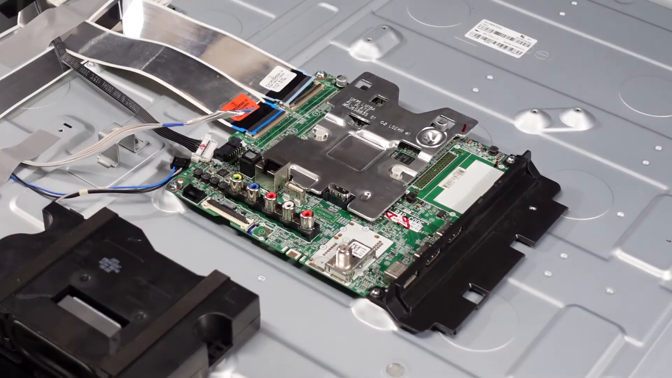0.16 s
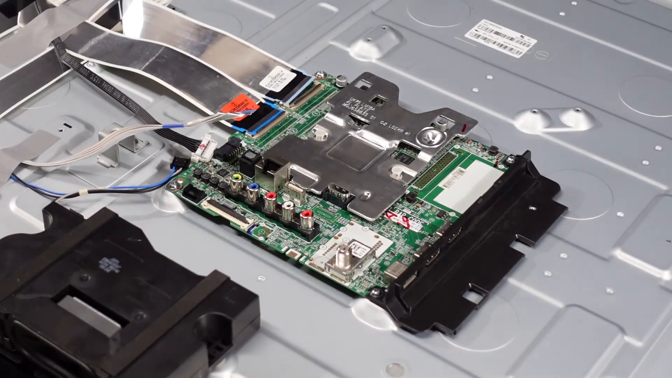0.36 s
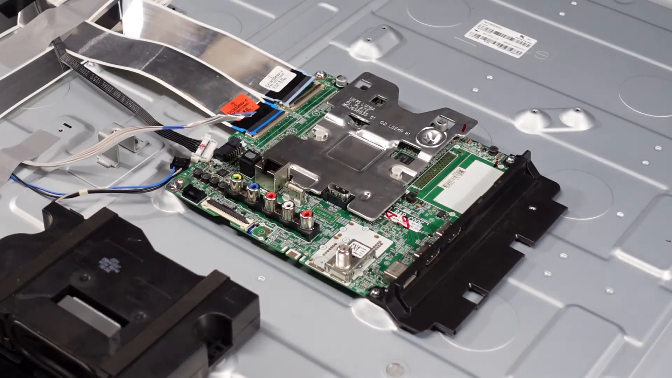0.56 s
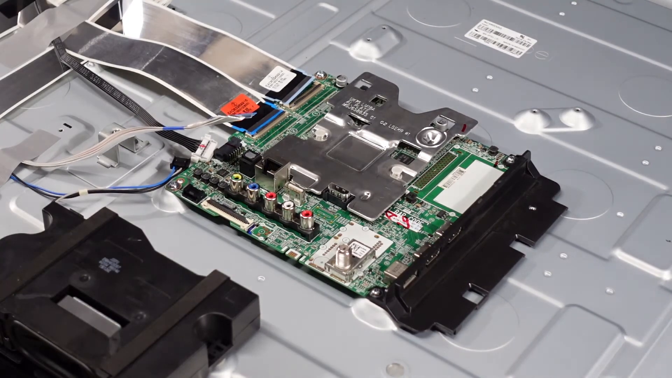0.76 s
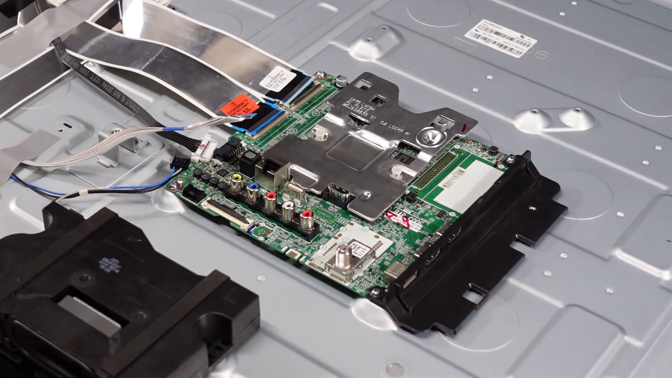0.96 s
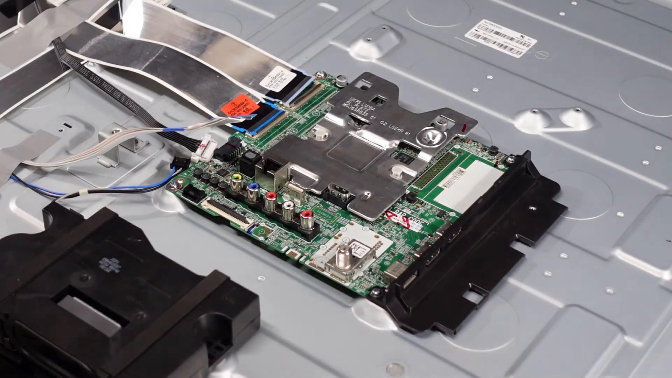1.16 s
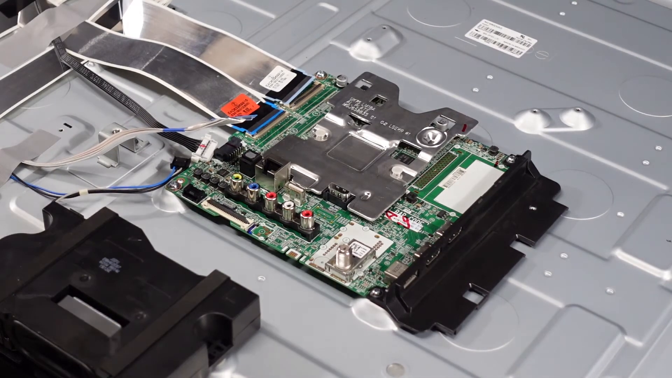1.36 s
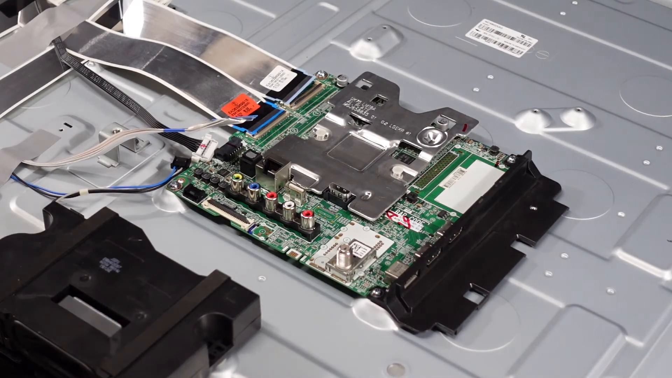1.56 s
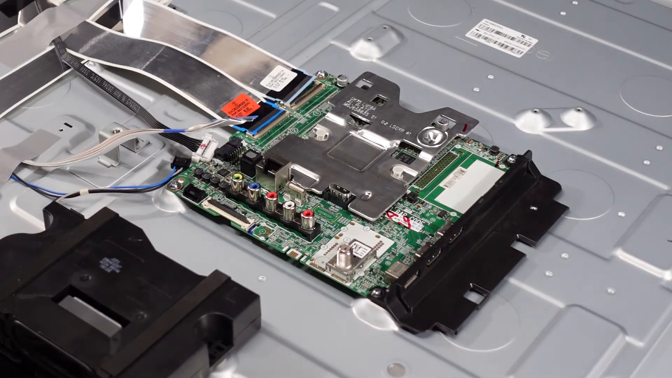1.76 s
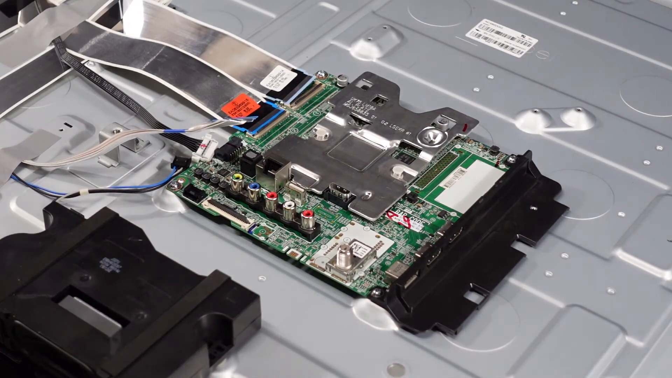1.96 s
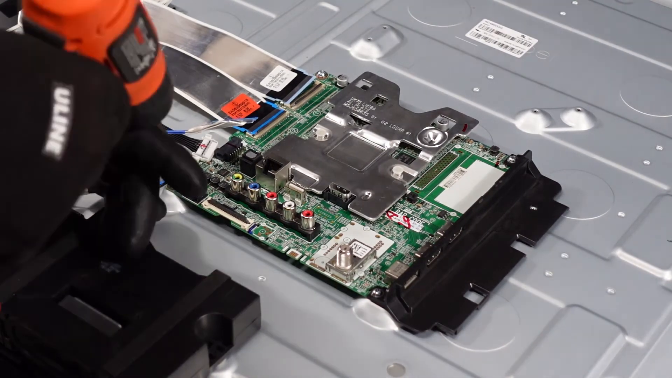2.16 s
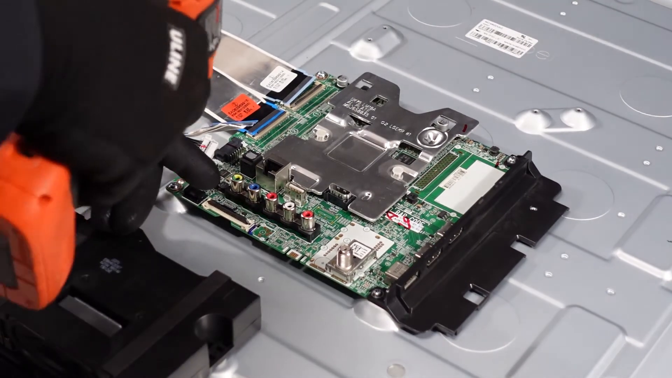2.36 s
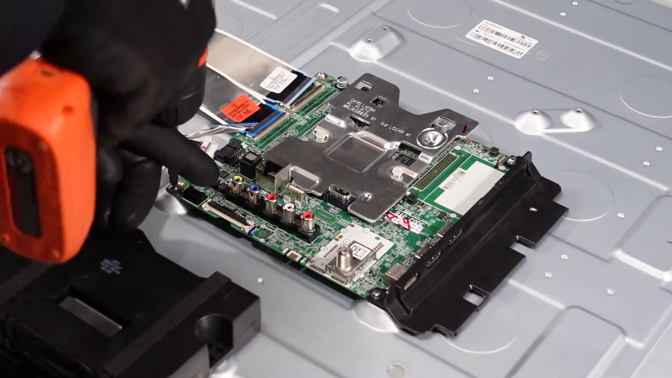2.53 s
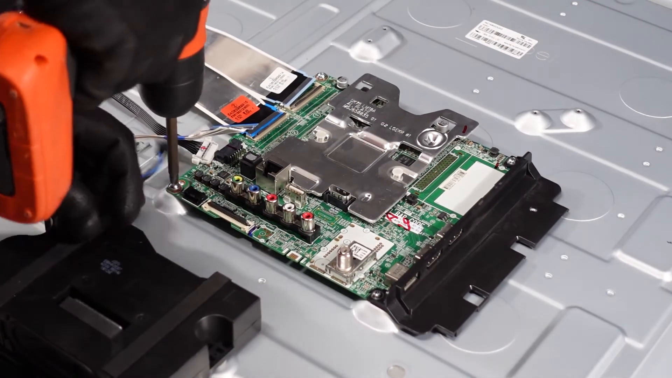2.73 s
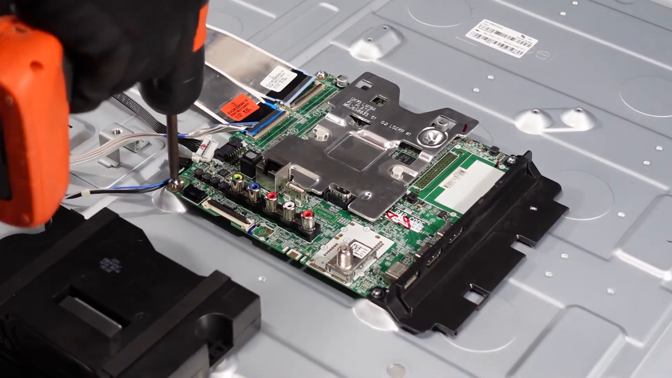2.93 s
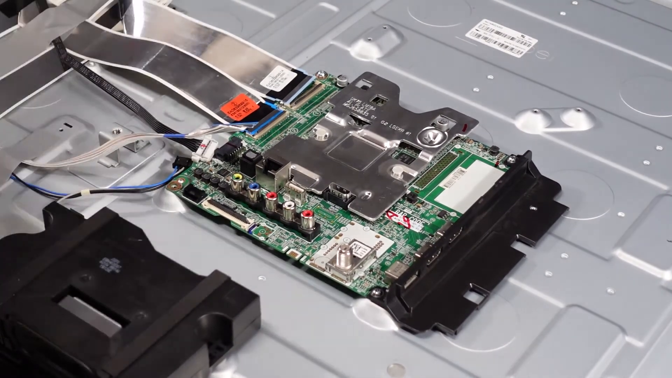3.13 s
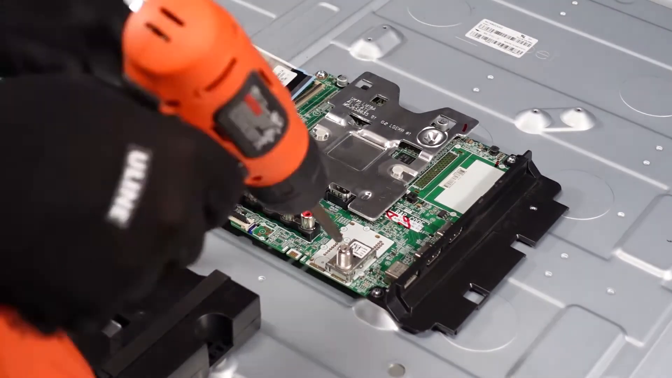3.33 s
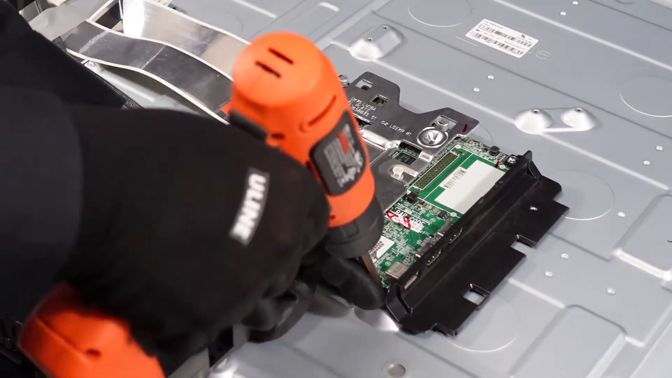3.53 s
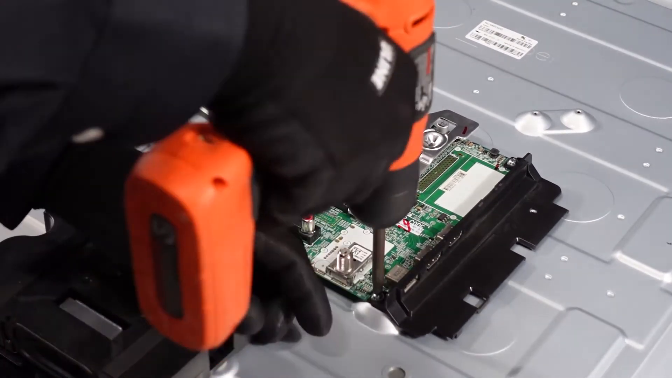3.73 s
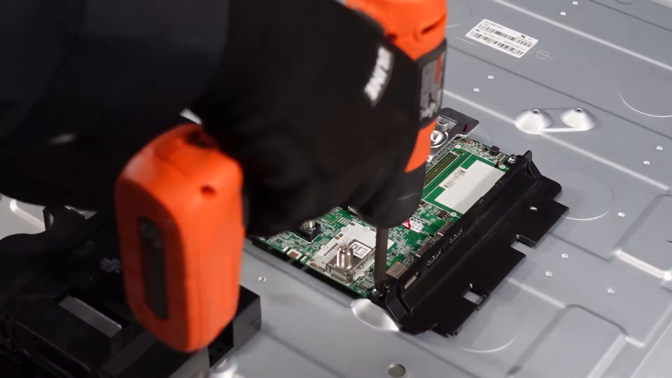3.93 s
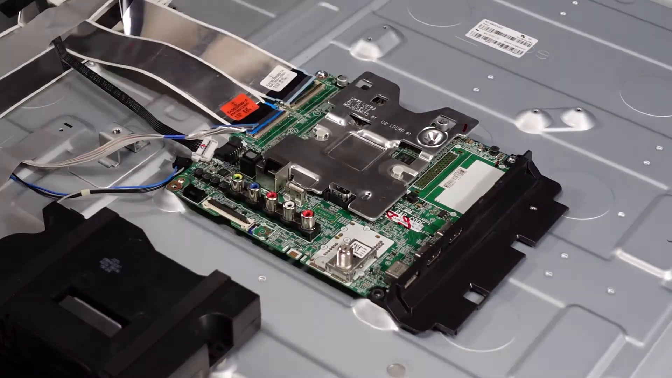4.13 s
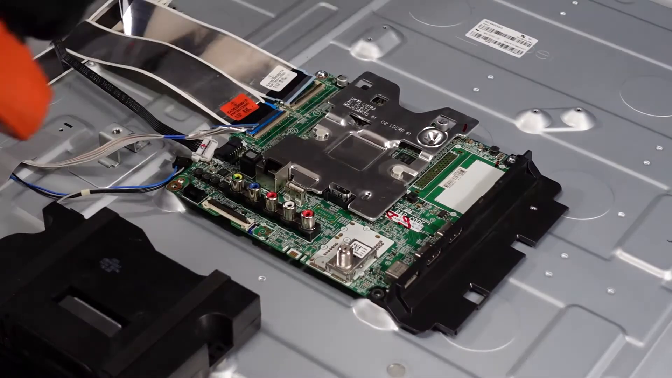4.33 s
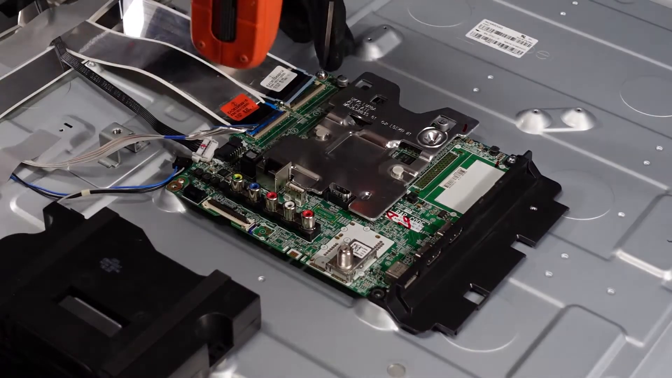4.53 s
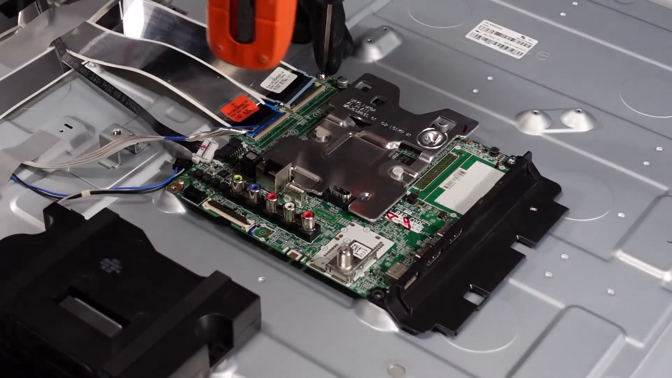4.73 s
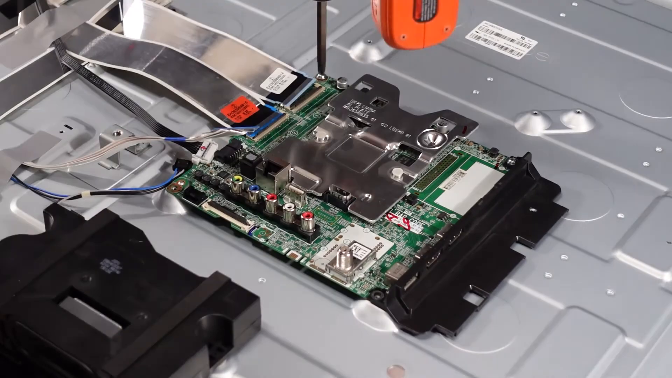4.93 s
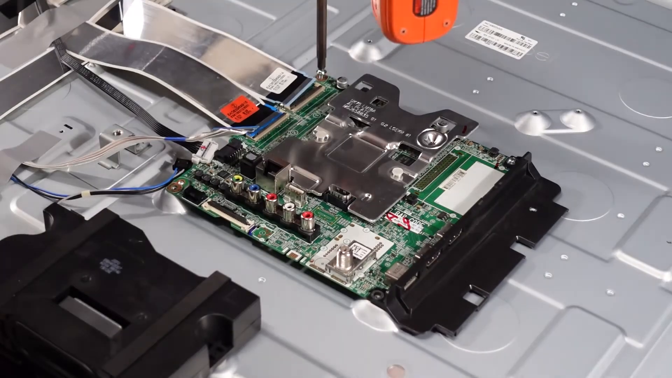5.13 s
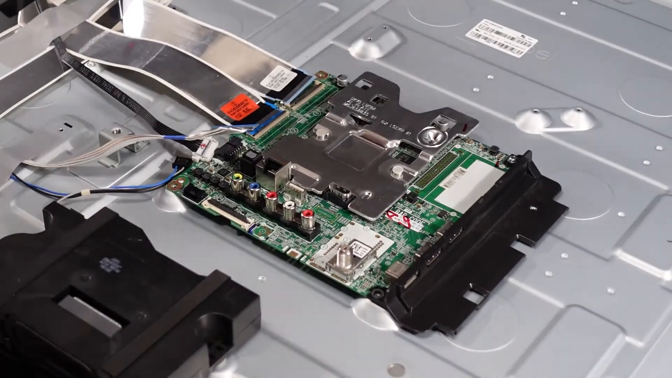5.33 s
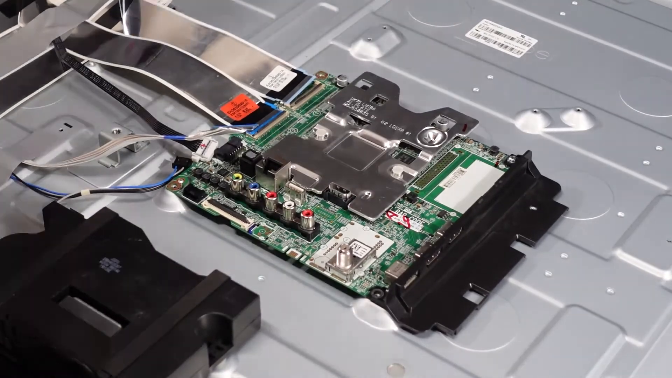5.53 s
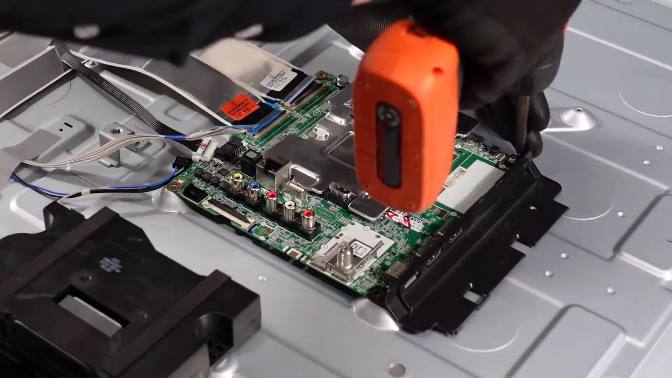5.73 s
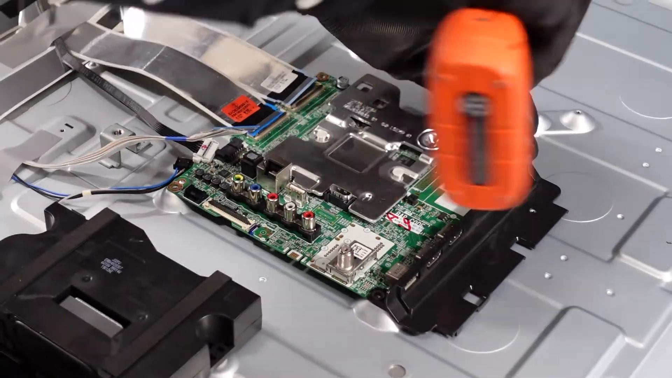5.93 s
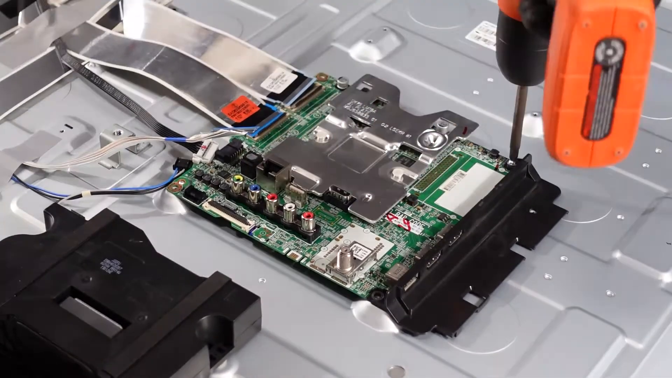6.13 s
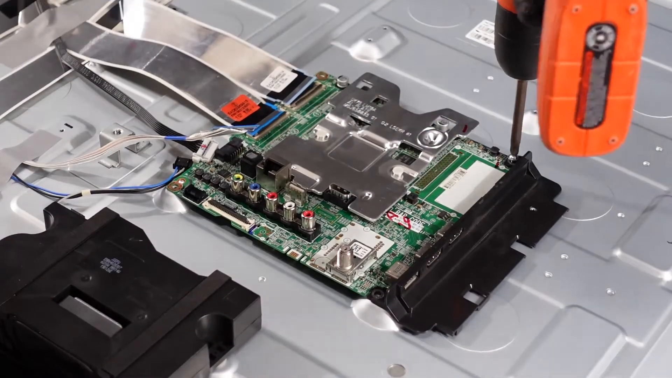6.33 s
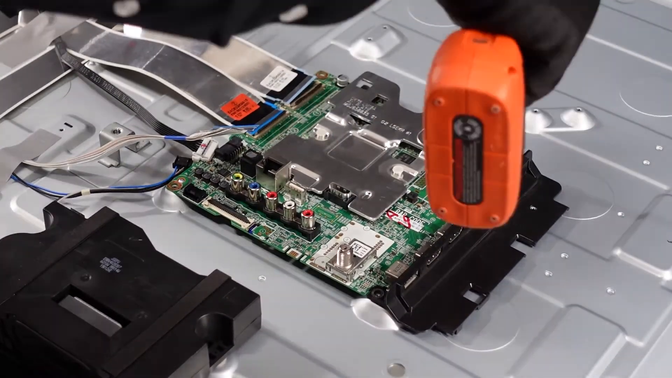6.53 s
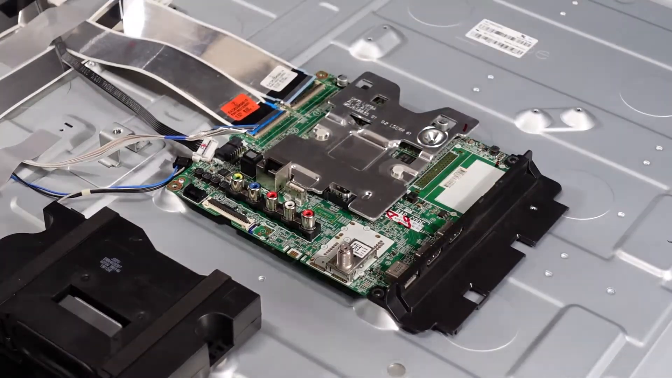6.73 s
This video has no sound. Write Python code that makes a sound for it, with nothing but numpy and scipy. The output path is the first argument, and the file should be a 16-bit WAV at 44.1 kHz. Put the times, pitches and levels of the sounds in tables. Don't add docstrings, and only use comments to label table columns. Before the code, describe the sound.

Quiet workshop with a bench thump and knock, then sped-up, high-pitched driver whines spin out four screws amid sharp clacks and ringing sheet metal.

```python
import sys
import numpy as np
from scipy import signal
from scipy.fft import rfft, irfft, next_fast_len
from scipy.io import wavfile

SR = 44100
rng = np.random.default_rng(int(sys.argv[2]) if len(sys.argv) > 2 else 0)


def digitize_waveform(pressure):
    field = np.atleast_2d(pressure).T
    bounded = np.clip(field, -1, 1)
    quanta = np.round(bounded * 32767).astype(np.int16)
    wavfile.write(sys.argv[1], SR, quanta)


def volts_from_decibels(level):
    exponent = np.asarray(level, float) / 20
    return 10 ** exponent


N = 299192
HUM_HZ, QUIET_DB = 119.5, -60


def rms_one(x):
    return x / np.sqrt(np.mean(x ** 2) + 1e-20)


def in_time(spans):
    s, *columns = np.transpose(np.vstack(spans))
    return [np.interp(np.arange(N) / SR, s, c) for c in columns]


def gate(start, end, edge):
    return np.interp(np.arange(N) / SR, [start, start + edge, end - edge, end], [0, 1, 1, 0])


def drift(rate):
    r = np.exp(-32 * np.pi * rate / SR)
    slow = signal.lfilter([1], [1, -2 * r, r * r], rng.standard_normal(N // 16 + 602))[600:]
    return np.interp(np.arange(N) / 16, np.arange(len(slow)), rms_one(slow))


def coloured(x, spectrum):
    hz, db = np.transpose(spectrum)
    size = next_fast_len(N, True)
    grid = np.arange(1, size // 2 + 2) * SR / size
    gain = volts_from_decibels(np.interp(np.log(grid), np.log(hz), db, -90, -90))
    return rms_one(irfft(rfft(x, size) * gain, size)[:N])


def grains(per_s, spread_db):
    out = rng.standard_normal(N)
    marked = rng.random(N) < per_s / SR
    out[marked] *= 1 + volts_from_decibels(spread_db * np.minimum(rng.exponential(1, N)[marked], 3))
    return out


def ring(x, hz, t60):
    r, w = volts_from_decibels(-60 / (t60 * SR)), 2 * np.pi * hz / SR
    return signal.lfilter([0, np.sin(w)], [1, -2 * r * np.cos(w), r * r], x + 1e-18)


def cut(x, order, hz, kind="high"):
    return signal.sosfilt(signal.butter(order, hz, kind, fs=SR, output="sos"), x)


def room_tone(spectrum, hum_hz, width_hz, hum_db):
    hum = rms_one(ring(rng.standard_normal(N), hum_hz, 2.2 / width_hz))
    return rms_one(coloured(rng.standard_normal(N), spectrum) + volts_from_decibels(hum_db) * hum)


# frequency in Hz, level in dB per Hz.
ROOM = [(18, -69), (30, -52), (134, 0.5), (180, -5.5), (362, -6.5), (441, -8), (487, -11.5), (644, -15),
        (2700, -71.5), (3230, -34), (3500, -35), (4550, -62), (7700, -120)]
# start in seconds, level in dB, seconds to fall 10 dB.
SETTLE = [
    (.38, -41, 0.2259),
    (1.08, -52, 0.3146),
    (1.36, -35.5, 0.0008),
]


def quiet_room(hands_db):
    t = np.arange(N) / SR
    low = volts_from_decibels(-54 + 0.1393 * (hands_db - QUIET_DB))
    for s, db, fall_s in SETTLE:
        low += gate(s, 99, 0.0656) * volts_from_decibels(db) * np.exp(-np.log(10) / 2 * np.clip(t - s, 0, 2) / fall_s)
    return room_tone(ROOM, HUM_HZ, width_hz=6, hum_db=-6) * low * volts_from_decibels(2.569 * drift(8.508))


# frequency in Hz, level in dB per Hz.
MID = [(400, -20.5), (700, -7.5), (1200, -6), (2500, -12), (3500, -18)]
# frequency in Hz, level in dB per Hz.
SLEEVE = [(1180, -47.5), (2000, -6), (2420, -8), (2620, -6.5), (4490, -7.5), (7510, -16.5), (12400, -18.5),
          (16000, -40)]
# start and end in seconds, mid level in dB, bright level in dB.
DRAGS = [
    (0.449, 0.476, -49.5, -55.5),
    (.5, .6, -52, -62),
    (1.043, 1.194, -60, -55.5),
    (1.296, 1.323, -39, -39),
    (1.31, 1.441, -43.5, -42.5),
    (1.403, 1.413, -60.5, -43),
    (2.002, 2.089, -54.5, -49.5),
    (2.021, 2.154, -65.5, -60.5),
]


def sleeve_rustle(hands_db):
    mid, sleeve = volts_from_decibels(hands_db - 1), volts_from_decibels(hands_db + 0.088)
    for start, end, mid_db, bright_db in DRAGS:
        drag = gate(start, end, .12 * (end - start))
        mid += volts_from_decibels(mid_db) * drag
        sleeve += volts_from_decibels(bright_db) * drag
    dull = coloured(grains(200, 4.0), MID) * mid * volts_from_decibels(1.5 * drift(30))
    return dull + coloured(grains(500, 4.0), SLEEVE) * sleeve * volts_from_decibels(1.5 * drift(30))


# frequency in Hz, width in Hz, level in dB.
BENCH = [
    (121.49, 4.907, -2.5),
    (323.48, 4.31, -1),
    (434.6, 47.74, 1.5),
    (654.1, 113.15, 3),
]
# start and end in seconds, level in dB, fade in dB per second.
SHAKES = [
    (.43, 0.4711, -21, 11),
    (0.502, 0.53407, -36.5, -90),
    (0.535, 0.7, -33, 172),
    (0.373, 0.40334, -46, 50),
    (1.303, 1.303, -34, 0),
    (1.317, 1.4882, -39, 39),
]


def bench_shakes():
    t, out = np.arange(N) / SR, np.zeros(N)
    jolts = grains(150, 4.0)
    bench = rms_one(sum(volts_from_decibels(db) * rms_one(ring(jolts, hz, 1.5386 / width)) for hz, width, db in BENCH))
    for start, end, db, fade in SHAKES:
        during = slice(round(start * SR), round(end * SR))
        shaken = (bench * gate(start, end, 0.001303))[during]
        out[during] += shaken * volts_from_decibels(db - fade * (t[during] - start))
    return out


# time in seconds, peak in dB, pitch in Hz, t60 in seconds.
KNOCKS = [
    (0.904, -36, 301.4, 0.04025),
    (1.307, -9, 521.9, 0.03135),
    (1.311, -11.5, 913.5, 0.007674),
    (1.332, -10, 664.5, 0.01559),
    (1.66, -47.5, 2500, 0.003596),
    (1.68, -26, 2546, 0.001726),
    (1.704, -24, 1648, 0.001854),
    (1.784, -27.5, 1980, 0.001098),
    (1.985, -31, 2009, 0.00239),
    (2.008, -32, 1484, 0.003986),
]


def knocks():
    out = np.zeros(N)
    for s, db, hz, t60 in KNOCKS:
        click = np.zeros(SR // 8)
        click[0] = volts_from_decibels(db - 4.5)
        overtone = 0.5578 * ring(click, 2.0855 * hz, t60)
        surface = 0.2894 * ring(click, 3506.2, 0.00932)
        out[round(s * SR):][:len(click)] += ring(click, hz, t60) + overtone + surface
    return out


# time in seconds, rustle in dB.
HANDS_SLOW = [(0, -60.5), (.15, -65.5), (.34, -61.5), (.43, -56), (.7, -61), (.8, -57), (.98, -64),
              (1.12, -59), (1.45, -53.5), (1.53, -59), (1.62, -53.5), (1.86, -65.5), (2.0, -62),
              (2.145, -61.5)]
# start and end in seconds, level in dB.
DROPOUT = (.477, 0.4907, -29)


def slow_part():
    hands_db, = in_time([HANDS_SLOW])
    out = quiet_room(hands_db) + sleeve_rustle(hands_db) + bench_shakes() + knocks()
    start, end, dip_db = DROPOUT
    return out * (1 - (1 - volts_from_decibels(dip_db)) * gate(start, end, 0.000863))


# time in seconds, rustle in dB.
HANDS_FAST = [(2.155, -55), (2.5, -66.5), (2.66, -58.5), (3.14, -56), (3.24, -64), (3.35, -56.5),
              (3.47, -62), (3.6, -56.5), (3.73, -59.5), (4.15, -58.5), (4.28, -63), (4.44, -53),
              (4.62, -64.5), (4.86, -57), (5.9, -60), (6.13, -51), (6.67, -58.5), (6.78, -58)]
# frequency in Hz, level in dB per Hz.
FAST_ROOM = [(240, -56.5), (400, -6), (561, -4), (650, 2), (1090, -0.5), (2240, -3.5), (3040, -15.5),
             (5000, -21.5), (6500, -53.5), (11000, -110)]
# frequency in Hz, level in dB per Hz.
FAST_RUSTLE = [(1500, -25.5), (2500, -2), (4000, -3), (6000, -4.5), (10000, -6.5), (14000, -7),
               (16500, -7.5)]


def fast_bed():
    speed_up = 4.76
    rustle_db, = in_time([HANDS_FAST])
    room_db = -50 + 0.7345 * (rustle_db - QUIET_DB)
    room = room_tone(FAST_ROOM, HUM_HZ * speed_up, width_hz=7, hum_db=-5) * volts_from_decibels(room_db + 2.51 * drift(30.2))
    room += volts_from_decibels(-68) * rms_one(ring(rng.standard_normal(N), hz=400, t60=.03))
    return room + coloured(grains(540, 3.2), FAST_RUSTLE) * volts_from_decibels(rustle_db + 2.355 * drift(50))


# frequency in Hz, level in dB, t60 in seconds.
CHASSIS = [(580.44, 0, 0.08804), (727.14, -11, 0.14475), (780.03, -6, 0.05284), (963.45, -4, 0.09761),
           (1109.4, 1, 0.02874), (1265.2, 5, 0.02661), (1422.7, 7, 0.02387), (1637.1, 4, 0.03486),
           (1808.2, 3, 0.03183), (2162.2, 5.5, 0.019706), (2373, -1.5, 0.02036), (2946.1, -11.5, 0.05625),
           (3106, -34, .012), (4504, -41.5, 0.0067)]


def chassis(push, strengths, ring_share):
    return sum(volts_from_decibels(db + k) * ring(push, hz, t60 * ring_share) for (hz, db, t60), k in zip(CHASSIS, strengths))


def mode_luck(rows):
    return rng.normal(0, 1.8, (len(rows), len(CHASSIS)))


def boom(db):
    return db * (np.arange(len(CHASSIS)) == 0)


def by_time(kinds):
    return sorted((*row, *traits) for table, *traits in kinds for row in table)


def bent(x, lag_s):
    size = next_fast_len(len(x) + 1024, True)
    hz = np.fft.rfftfreq(size, 1 / SR)
    delay_turns = lag_s * (2 * np.sqrt(1000 * hz) - hz / 4)
    return irfft(rfft(x, size) * np.exp(-2j * np.pi * delay_turns), size)[:len(x)]


# frequency in Hz, level in dB per Hz.
BRIGHT = [(2500, -1.5), (3800, -3), (5000, -4.5), (7200, -4), (10000, -2.5), (14000, -0.5), (16500, 4.5)]
# time in seconds, peak in dB, hardness 0-1, boom of the lowest mode in dB.
CLACKS = [
    (2.94, -2.5, 0.43, -0.5),
    (2.97, -5, 0.72, -3.5),
    (3.926, -3.5, 0.58, 4),
    (3.956, -3.5, 0.42, 2.5),
    (3.99, -10.5, 0.6, -5.5),
    (5.211, -1.5, 0.59, 3.5),
    (5.241, -3, 0.64, 4),
    (6.331, -2, 0.95, -1),
    (6.36, -4.5, 0.95, -5),
    (6.392, -4, 0.58, -7),
]
# time in seconds, peak in dB, hardness 0-1, boom in dB.
TICKS = [(2.17, -0.5, 0.41, -3.5), (2.176, -12.5, 0.45, 10), (2.521, -17, .5, -5), (2.6255, -10, 0.3, -9.5),
         (3.3138, -8.5, 0.08, -3.5), (3.319, -8, 0.38, -4.5), (3.3272, -4, 0.17, -12.5),
         (3.387, -10, 0.56, -20), (3.5785, -9, .3, -5), (3.5995, -14, .3, -5), (3.679, -17, .2, -5),
         (4.208, -30.5, 0.23, -3), (4.22, -18.5, 0.04, -5), (4.4212, -11.5, 0.37, 11.5),
         (4.427, -11.5, 0.23, 5.5), (4.634, -15, 0.3, 2), (5.6512, -11.5, 0.19, -11.5),
         (5.995, -13.5, 0.7, -14)]
# time in seconds, peak in dB, hardness 0-1, boom in dB.
RAPS = [(2.288, -23, 0, -4), (2.52, -18.5, 0.56, -7), (2.544, -12, 0.4, -11), (2.683, -9, 0.07, 11),
        (3.119, -20, 0, -11.5), (3.198, -20, 0.01, -13), (3.214, -30, 0.68, -6.5), (3.338, -30.5, 0, 7.5),
        (3.427, -29, 0, 7.5), (3.486, -34.5, 0, 5.5), (3.578, -12, 0.47, -2), (3.748, -1.5, 0.37, 4.5),
        (4.332, -10, 0.66, 2.5), (4.47, -26.5, 0, 3), (4.915, -31, 0.4, -8)]
# time in seconds, peak in dB, hardness 0-1, boom in dB.
FLICKS = [(3.345, -30.5, 0.35, 1), (3.517, -26, 0.43, -1.5), (3.599, -14, 0.64, -9),
          (3.646, -18, 0.59, -6.5), (4.617, -18.5, 0.37, 3.5), (4.81, -30, 0.49, -0.76),
          (4.879, -26, 1, -2.5), (5.508, -28, 0.55, 10.7616), (6.03, -28, 0.64, -8.5)]


def taps():
    out, since = np.zeros(N), np.arange(SR // 8) / SR
    rows = by_time([(CLACKS, -16.5, 0.6178, .00005), (TICKS, -37, 0.14483, 0.0007966),
                    (RAPS, -24, 0.47247, .0001), (FLICKS, -17, 0.6724, .0001)])
    air, rebounds = coloured(rng.standard_normal(N), BRIGHT), grains(650, 2.153)
    for (s, peak_db, hardness, boom_db, fizz_db, ringing, lag_s), strengths in zip(rows, mode_luck(rows)):
        at = round(s * SR)
        during = slice(at, at + len(since))
        pace = 2 * np.pi * 1000 * 12 ** np.clip(hardness, -.4, 1) * since
        click = pace ** 3 * np.exp(-pace)
        train = 0.06982 * rebounds[during] * np.exp(-since / (0.021573 * ringing))
        train[0] = 1
        push = signal.fftconvolve(train, click[:200])[:len(since)]
        rung = chassis(push, strengths + boom(boom_db), 1.8158 * ringing)
        direct = np.gradient(click)
        direct = np.clip(hardness + .25, 0, 1) * direct / direct.max()
        hit = -0.8 * rung / np.abs(rung).max() - 0.8 * direct
        fizz = air[during] * np.exp(-since / 0.00471)
        out[during] += volts_from_decibels(peak_db) * bent(hit, lag_s) + volts_from_decibels(peak_db + fizz_db) * fizz
    return out


# time in seconds, peak in dB, length in seconds, body re
# peak in dB, boom of the lowest mode in dB.
SKIDS = [
    (2.241, -41, 0.00737, -19.5, -2),
    (3.2835, -12, 0.012049, -13.5, -9),
    (3.3824, -47.5, 0.00138, -16.5, 0.4287),
    (4.155, -43, 0.00405, -16, -3),
    (4.167, -39, 0.00431, -20.5, 0.3283),
    (4.311, -15, 0.012413, -9.5, 7.5),
    (4.9478, -16, 0.00866, -10, 0.3879),
    (5.533, -15.5, 0.012244, -12.5, -9),
    (6.1424, -14.5, 0.01953, -6.5, 9.5),
]
SCUFFS = [
    (2.4169, -42, 0.004833, -14.5, 2),
    (2.676, -15.5, 0.01583, -2, 3.8977),
    (3.577, -20.5, 0.006406, -15, 0.5),
    (3.738, -18.5, 0.019, -10, 7),
    (4.907, -34, 0.005024, -5.5, 4),
    (5.941, -37.5, 0.00478, -2, 1),
    (5.9478, -19, 0.0115, -1, -9.5),
    (5.995, -23, 0.006577, 3.5, -1.5),
    (6.014, -26.5, 0.00683, -4, 4.5),
    (6.702, -51, 0.00761, 3.5, 3.5),
]
SCRAPES = [(2.426, -42.5, 0.00603, 2.92, 0.0998), (2.5152, -27.5, 0.00969, 3.04, 0.101),
           (2.5418, -24.5, 0.00986, 3.38, 0.1), (2.599, -35.5, 0.01, 2.317, 0.0997),
           (3.187, -50.5, 0.00923, 5.11, 0.0992), (4.204, -44.5, 0.0119, 2.914, 0.1),
           (4.657, -33, 0.00277, 3.644, 0.1001), (4.6793, -40, 0.002982, 2.93, 0.1),
           (4.727, -41, 0.003327, 3.78, 0.1003), (4.7334, -28, 0.004666, 7.445, 7.16),
           (4.761, -20.5, 0.008838, 5.296, 0.1), (5.894, -37, 0.00438, 3.67, 0.1001),
           (6.5884, -17.5, 0.012697, 3.622, 0.102)]
SEATINGS = [(2.653, -50.5, 0.00414, 5.09, 7), (3.262, -55, 0.00883, 13.98, 5.),
            (3.374, -46.5, 0.001693, 9.3, 22), (3.538, -37, 0.00948, 8.77, -7),
            (3.548, -33, 0.02217, 12.173, -12), (3.606, -40, 0.00841, 2.855, -3.5),
            (3.628, -23, 0.008417, 4.27, 11), (3.638, -26, 0.008533, 8.17, -4.5),
            (3.679, -19, 0.005238, 2.317, 11), (3.686, -25, 0.00846, 7.568, 14),
            (4.265, -55, 0.00726, 4.59, 7.5), (5.806, -40.5, 0.003843, 6.14, 14.9656),
            (5.815, -31.5, 0.004635, 5.478, 8.5)]


def scuffs():
    out = np.zeros(N)
    rows = by_time([(SKIDS, -19, 9200), (SCUFFS, -29, 6240), (SCRAPES, -27, 6240), (SEATINGS, -19.5, 6240)])
    grit, air = grains(500, 5.0), coloured(grains(1100, 2.5), BRIGHT)
    for (s, peak_db, length, body_db, boom_db, bit_db, bit_hz), strengths in zip(rows, mode_luck(rows)):
        at = round(s * SR)
        since = np.arange(min(N - at, SR // 6)) / SR
        during = slice(at, at + len(since))
        rise = 0.001394 + 0.2822 * length
        fade = np.exp(-since / np.clip(length, .001, .04)) * (1 - np.exp(-since / np.clip(rise, .0003, .03)))
        fade = fade / fade.max()
        rubbing = grit[during] * fade
        rung = chassis(rubbing, strengths + boom(boom_db), 0.7036)
        body = volts_from_decibels(body_db) * rung / np.std(rung[:800])
        steel = volts_from_decibels(bit_db) * ring(rubbing, bit_hz, t60=0.00547)
        out[during] += volts_from_decibels(peak_db - 10.5) * (air[during] * fade + body + steel)
    return out


# time in seconds, peak in dB, pitch in Hz.
SPARKS = [(2.523, -30.5, 8980), (2.545, -17, 13100), (2.603, -40, 7000), (2.687, -8.5, 7198),
          (3.151, -30, 5793), (3.161, -40.5, 5996), (3.2875, -14, 3995), (3.2878, -9.5, 8996),
          (3.2888, -19.5, 12990), (3.293, -29.5, 11030), (3.578, -28.5, 6213), (3.6, -22, 6254),
          (3.635, -20, 6303), (3.685, -23.5, 14010), (3.748, -12.5, 8974), (4.157, -31.5, 7968),
          (4.315, -14.5, 9015), (4.3213, -12.5, 9030), (4.617, -30, 11040), (4.652, -42, 11000),
          (4.734, -32.5, 11100), (4.763, -18, 9260), (4.769, -26, 9030), (4.812, -35, 8977),
          (4.952, -6.5, 9154), (5.537, -13.5, 8990), (5.5452, -11.5, 8990), (5.5505, -21.5, 9860),
          (5.874, -39, 10520), (5.877, -43, 9500), (5.881, -36, 9000), (5.883, -39, 10000),
          (5.887, -46.5, 9000), (5.895, -46.5, 9500), (5.899, -40, 10490), (5.906, -43, 10000),
          (5.915, -45, 9000), (5.948, -17.5, 9050), (5.953, -22, 14000), (5.956, -25.5, 8110),
          (5.98, -44, 10000), (5.997, -32, 9010), (6.031, -25, 10970), (6.147, -11, 8023),
          (6.15, -15, 13500), (6.152, -16, 9500), (6.156, -19, 6500), (6.595, -24, 9110)]


def sparks():
    out, since = np.zeros(N + SR), np.arange(400) / SR
    bursts = rng.standard_normal((len(SPARKS), len(since))) * np.exp(-since / 0.0005)
    for (s, db, hz), burst in zip(SPARKS, bursts):
        ping = ring(burst, hz, t60=.002)
        out[round(s * SR):][:len(since)] += volts_from_decibels(db) * ping / np.abs(ping).max()
    return out[:N]


COAST_S, BRAKE = .146, .4


def coast_down(since, least=.02):
    return np.clip((1 + BRAKE) * np.exp(-since / COAST_S) - BRAKE, least, 1)


BURSTS = [
    (2.677, 2.977),
    (3.740, 3.976),
    (4.943, 5.252),
    (6.142, 6.380),
]


def trigger():
    t = np.arange(N) / SR
    stop_s = COAST_S * np.log(1 + 1 / BRAKE)
    speed, coasting, on = np.ones(N), np.zeros(N), np.zeros(N)
    for start, release in BURSTS:
        inside = gate(start, release + stop_s, 0.006204)
        since = np.clip(t - release, 0, 1) * (inside > 0)
        speed *= 1 - .6 * np.exp(-(np.minimum(np.abs(t - start), .5) / .016) ** 1.25)
        speed *= coast_down(since)
        coasting += since
        on += inside
    return speed, coasting, on


# time in seconds, frequency in Hz.
SPEED_EARLY = [
    [(2.74, 15230), (2.762, 15415), (2.97, 15503)],
    [(3.8, 15253), (3.848, 15424), (3.965, 15427)],
]
# time in seconds, frequency in Hz.
SPEED = [
    [(5.0, 15300), (5.12, 15380), (5.2, 15510), (5.24, 15550)],
    [(6.2, 15440), (6.255, 15360), (6.3, 15515), (6.34, 15455), (6.37, 15460)],
]
# first crest and end in seconds, turn in seconds, swing in Hz.
BINDING = (4.983, 5.19, .0302, 95)


def rotor_pitch(speed):
    t = np.arange(N) / SR
    mesh_hz, = in_time(SPEED_EARLY + SPEED)
    crest, end, turn_s, swing_hz = BINDING
    wobble = gate(crest, end, .05) * np.cos(2 * np.pi * (t - crest) / turn_s)
    return (mesh_hz + swing_hz * wobble) / 9 * speed


# frequency in Hz, level in dB.
BLOOM = [
    (1300, -10),
    (1540, -7),
    (1625, 1),
    (1670, -9),
    (1705, 0),
    (1800, 0),
]
# frequency in Hz, level in dB.
HOUSING = [(1300, -16), (1750, -9), (2000, -12), (2400, -3), (2900, 0), (3400, -6), (4300, -10), (5000, 0),
           (5700, 1), (6500, -5), (7500, -4), (9000, -8), (12000, -1), (15500, 0)]
# multiple of the rotor, dB driven, dB coasting, both re the mesh tone
ORDER_LEVELS = [
    (2, -18, -25),
    (3, 0, -2),
    (5, -15, -26),
    (6, -19, -3),
    (7, -18, -22),
    (8, -17, -24),
    (9, 0, -6),
    (12, -30, -29),
    (18, -30, -22),
]


def rotor_tones(rotor_hz, turn, speed, coasting, on, rotor_db, mesh_db, third_db):
    driven = np.exp(-coasting / .014)
    bloom_db = np.interp(rotor_hz, *np.transpose(BLOOM)) * driven
    level = volts_from_decibels(rotor_db + 5.5 + bloom_db + .7 * drift(60)) * speed ** (7 - 5 * driven)
    tones = level * np.sin(turn + .07 * drift(50))
    busy = on > 0
    fade_db = (135 * coasting)[busy]
    short = (driven * (1 - speed))[busy]
    for multiple, driven_db, coast_db in ORDER_LEVELS:
        hz = multiple * rotor_hz[busy]
        coast_db = mesh_db[busy] + 3 + coast_db + np.interp(hz, *np.transpose(HOUSING))
        driven_db = driven_db + (third_db + 6 if multiple == 3 else mesh_db + 3)[busy]
        flutter_db = (2. * drift(150) + 2.5 * (1 - driven) * drift(40))[busy]
        level_db = coast_db + driven[busy] * (driven_db - coast_db) - fade_db
        level_db = level_db - 9 * (multiple - 3) * short + flutter_db
        wave = np.sin(multiple * turn[busy] + .15 * drift(100)[busy])
        tones[busy] += (hz < .45 * SR) * volts_from_decibels(level_db) * wave
    return tones


# frequency in Hz, level in dB per Hz.
RATTLE = [(300, -3.5), (560, -14.5), (1000, -6.5), (1500, -4.5), (1900, -5), (2200, -1.5), (2500, -12),
          (3000, -5), (4300, -9), (5500, -4.5), (7000, -5.5)]
# frequency in Hz, t60 in seconds, level in dB.
GEARBOX = [(579.93, 0.0563, -7.5), (1371.2, 0.0515, -8), (1488, 0.0837, 4), (1770.5, 0.05456, 9),
           (2142.4, 0.0732, -7.5), (2477.1, 0.021, 2), (2824.5, 0.0274, 3), (3422.4, 0.067, -18),
           (5819.8, 0.04705, -6.5)]


def gear_rattle(left, running, rattle_db, gear_db):
    left_db = 20 * np.log10(left)
    rattle_db = rattle_db + 3 * np.exp(-running / 0.04593) + 0.9567 * left_db
    rattle = coloured(grains(570, 2.092), RATTLE) * volts_from_decibels(rattle_db + 2.467 * drift(81))
    teeth = grains(230, 4.46)
    gears = rms_one(sum(volts_from_decibels(db) * rms_one(ring(teeth, hz, t60)) for hz, t60, db in GEARBOX))
    return rattle + gears * volts_from_decibels(gear_db + 4.254 * left_db + 2.0 * drift(33.68))


# low band in Hz, its level in dB,
# high band in Hz, its level in dB.
VENTS = [
    (7352.7, -2.5, 12525, -3.537),
    (7345.6, -8.5, 12568, -6.5),
    (9088, -7.0758, 10528, -5),
    (8808, -6, 10520, -2),
]


def vented(hiss):
    out = hiss.copy()
    for (start, release), (low_hz, low_db, high_hz, high_db) in zip(BURSTS, VENTS):
        during = slice(round(start * SR), round((release + COAST_S) * SR))
        for hz, db in ((low_hz, low_db), (high_hz, high_db)):
            out[during] += volts_from_decibels(db - 6) * rms_one(ring(hiss[during], hz, t60=0.002649))
    return out


# frequency in Hz, level in dB per Hz.
HISS = [(4000, -28.5), (5500, -24.5), (7100, -2.5), (8600, 0.5), (9600, 2.5), (10400, 0.5), (12100, 4.5),
        (14000, 0), (16500, -0.5)]


def brush_hiss(left, running, speed, coasting, turn, hiss_db):
    loaded = np.exp(-coasting / 0.0229)
    hiss_db = loaded * (hiss_db - 3.5 * running) + (1 - loaded) * -29
    hiss_db = hiss_db + 2.291 * 20 * np.log10(np.tanh(left / 0.28053))
    hiss = vented(coloured(grains(1300, 1.9), HISS)) * volts_from_decibels(hiss_db - 2.0 + 1.0 * drift(130))
    hiss *= 1 + 0.4997 * np.sin(turn)
    dull = cut(hiss, 2, 10000, "low")
    return dull + np.sqrt(speed) * (hiss - dull)


# mesh, rotor tone, third order, housing rattle, brush hiss
# and gearbox ring, all in dB.
BURST_LEVELS = [
    (-27.5, -29, -37, -33.5, -26.5, -40),
    (-27, -30, -39.5, -33, -28.5, -37.5),
    (-30.5, -32, -40, -37.5, -23.5, -32),
    (-28.5, -31.5, -43.5, -36, -23, -34.5),
]


def driver():
    speed, coasting, on = trigger()
    t = np.arange(N) / SR
    burst = np.searchsorted([start for start, _ in BURSTS[1:]], t)
    mesh_db, rotor_db, third_db, rattle_db, hiss_db, gear_db = np.array(BURST_LEVELS)[burst].T
    running = np.clip(t - np.array(BURSTS)[burst, 0], 0, np.ptp(BURSTS, axis=1)[burst])
    mesh_db, third_db = mesh_db - 4 * (running - .1), third_db - 8 * running
    rotor_hz = rotor_pitch(speed)
    turn = 2 * np.pi * np.cumsum(rotor_hz) / SR
    left = coast_down(coasting)
    tones = rotor_tones(rotor_hz, turn, speed, coasting, on, rotor_db, mesh_db, third_db)
    rattle = gear_rattle(left, running, rattle_db, gear_db)
    return on * (tones + rattle + brush_hiss(left, running, speed, coasting, turn, hiss_db))


def workshop(x):
    lag = np.arange(SR // 5) / SR
    tail = rng.standard_normal(len(lag)) * volts_from_decibels(-60 * lag / .08) * (lag > .002)
    return signal.fftconvolve(x, tail / np.linalg.norm(tail))[:N]


def microphone(near):
    return cut(near, 8, 550) + volts_from_decibels(-30) * cut(near, 3, 262) + volts_from_decibels(-32.5) * near ** 2


def scene():
    change_s = 2.147
    slow = cut(slow_part(), 4, 75)
    bed = cut(fast_bed(), 3, 400)
    near = taps() + scuffs() + sparks() + driver()
    near = near + volts_from_decibels(-15) * workshop(near)
    fast = microphone(near) + bed
    return (slow * gate(-1, change_s, 0.006394) + fast * gate(change_s, 99, 0.01313))[None]


def top_cut(x):
    return signal.sosfilt(signal.butter(12, 16980, fs=SR, output="sos"), x)


def record(dry):
    mix = signal.sosfilt(signal.ellip(10, .5, 50, 15700, fs=SR, output="sos"), dry)
    return top_cut(mix)


dry = scene()
out = record(dry)
digitize_waveform(out)
```